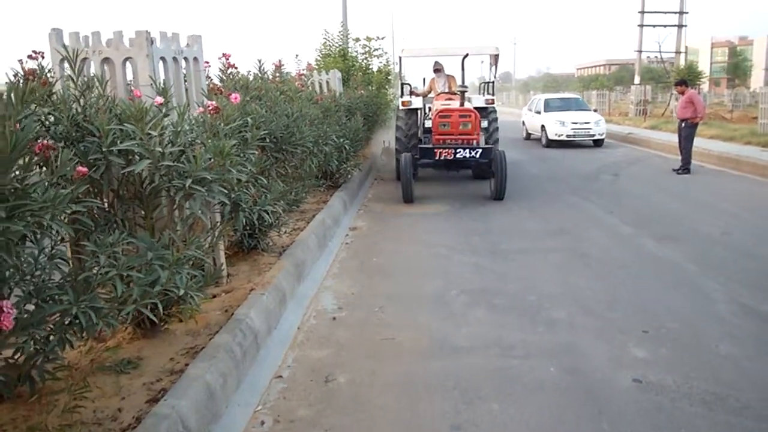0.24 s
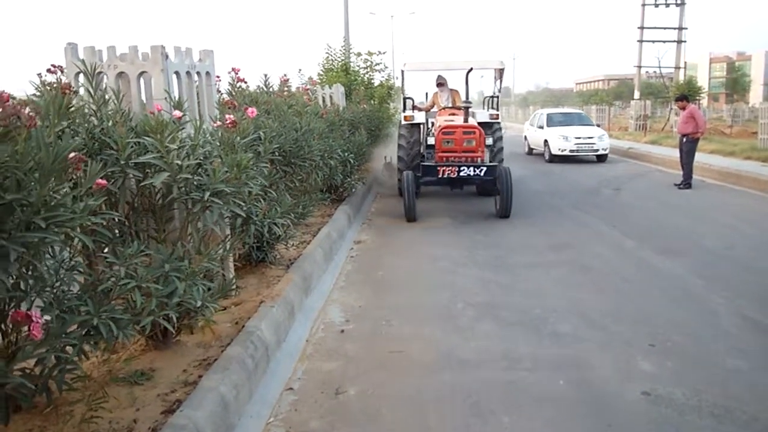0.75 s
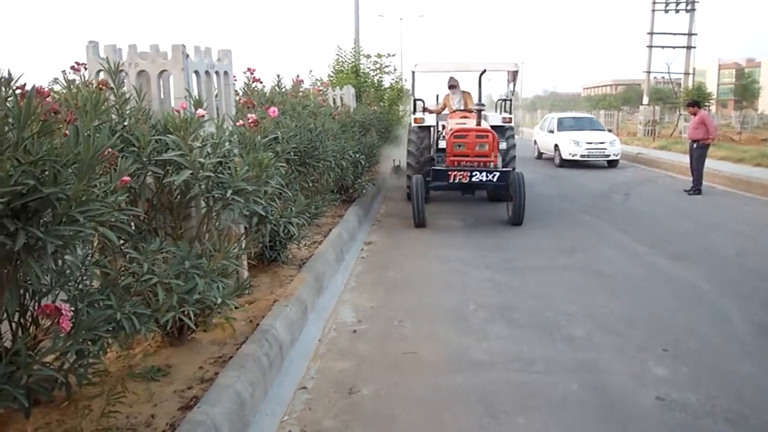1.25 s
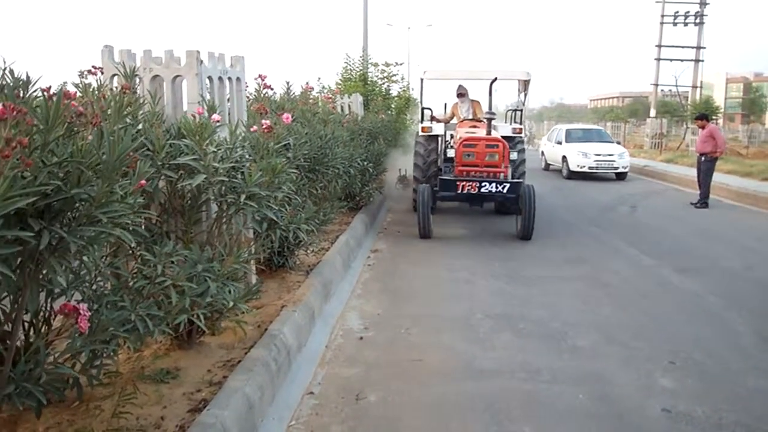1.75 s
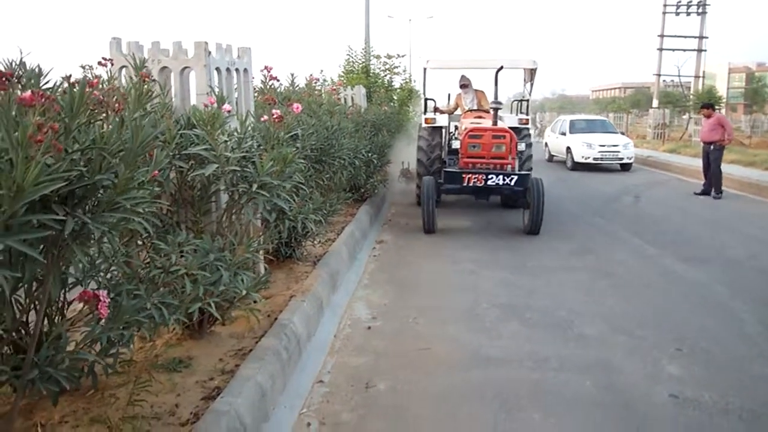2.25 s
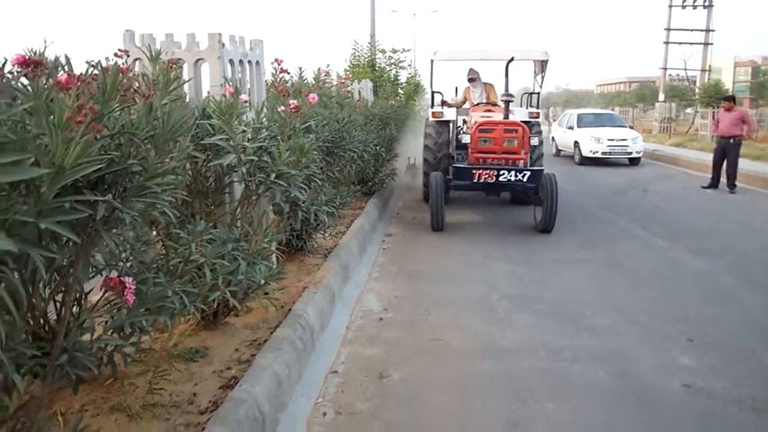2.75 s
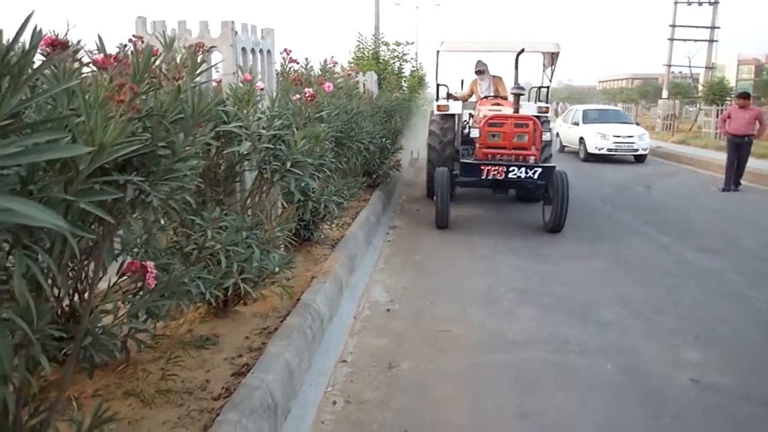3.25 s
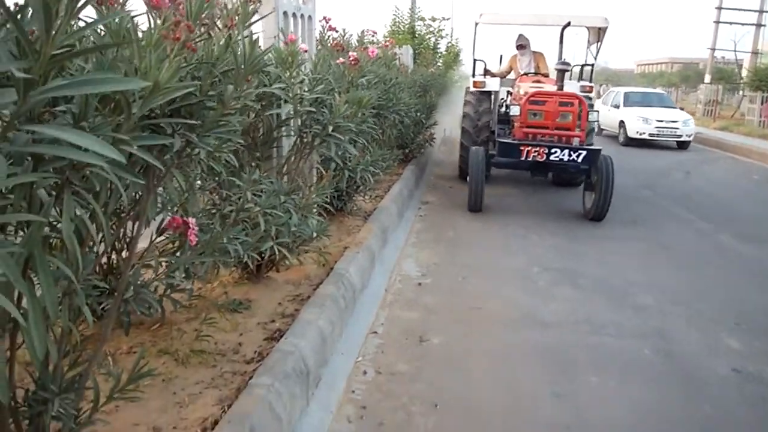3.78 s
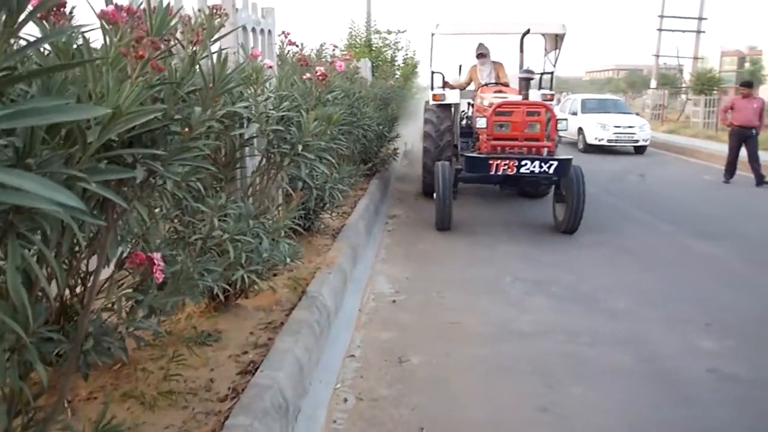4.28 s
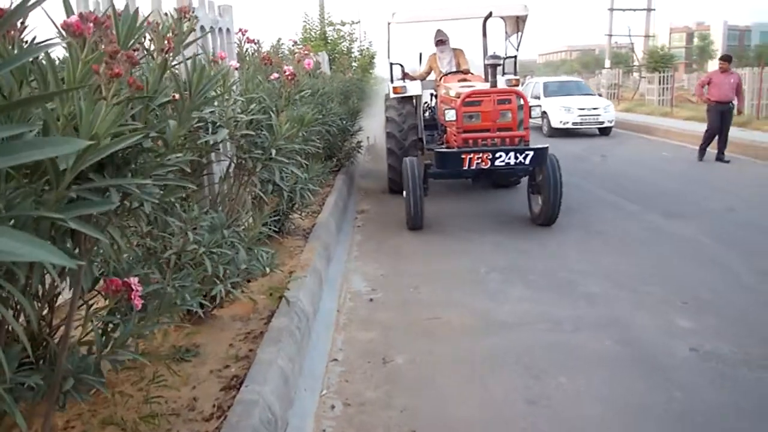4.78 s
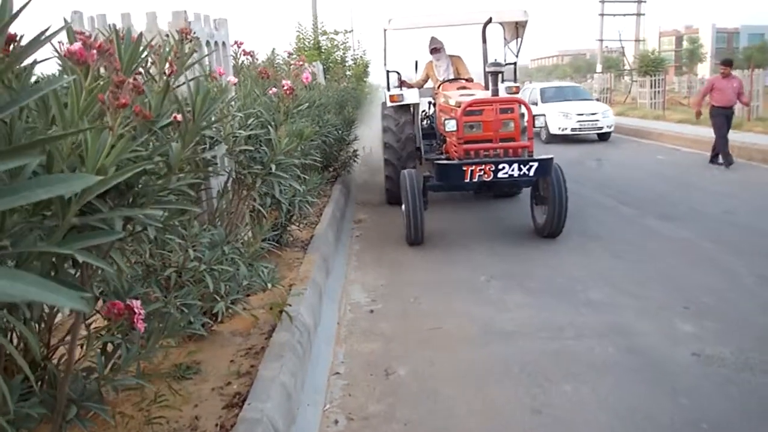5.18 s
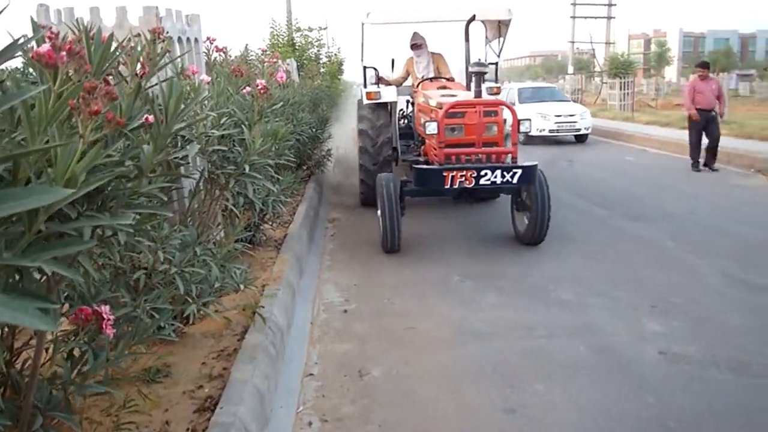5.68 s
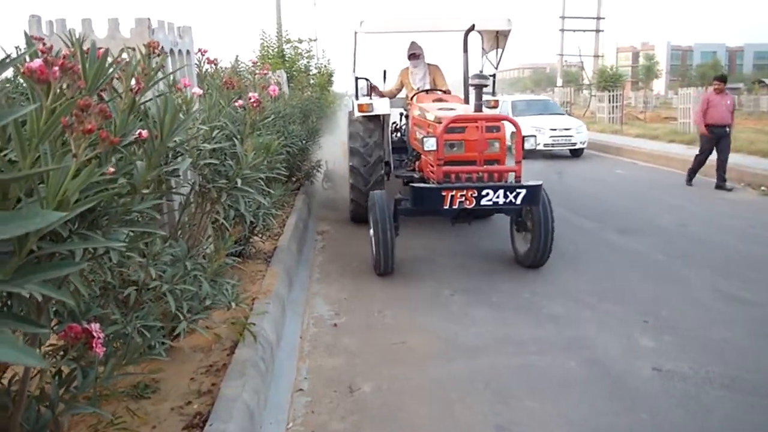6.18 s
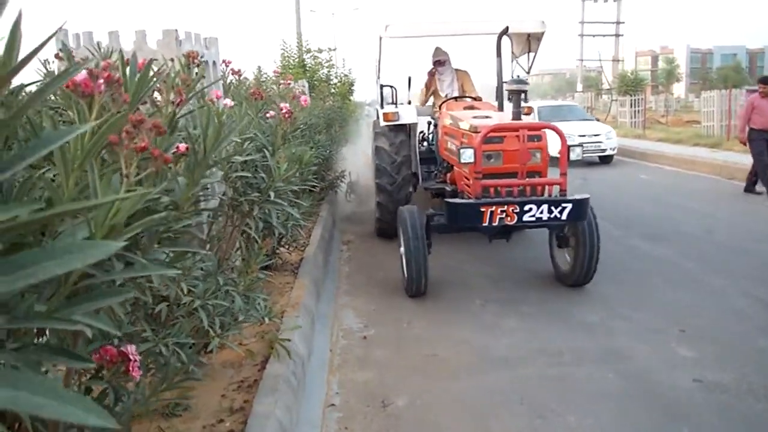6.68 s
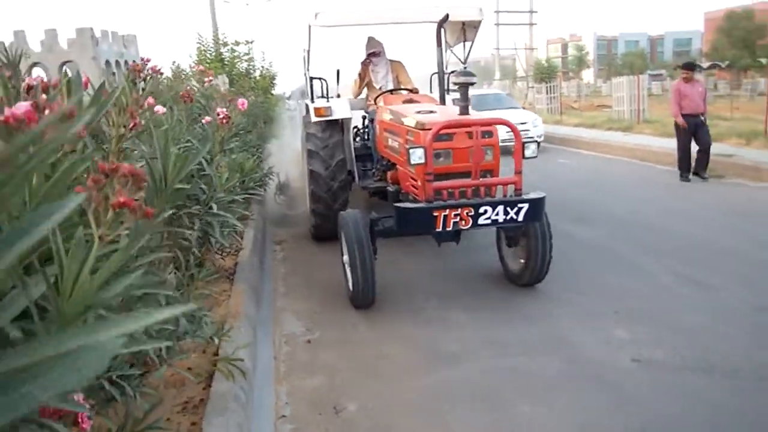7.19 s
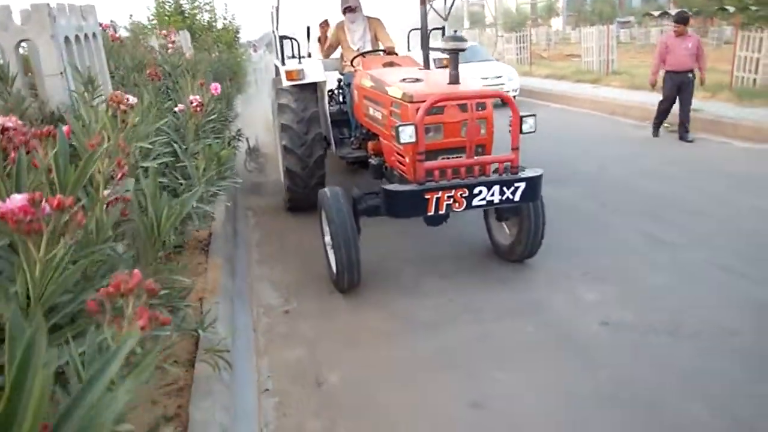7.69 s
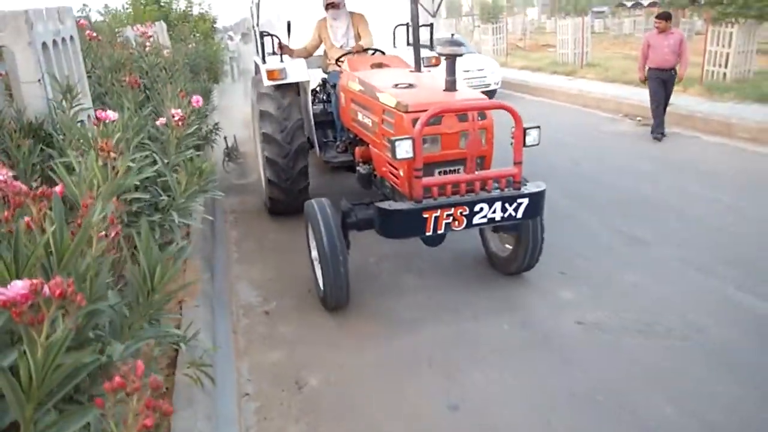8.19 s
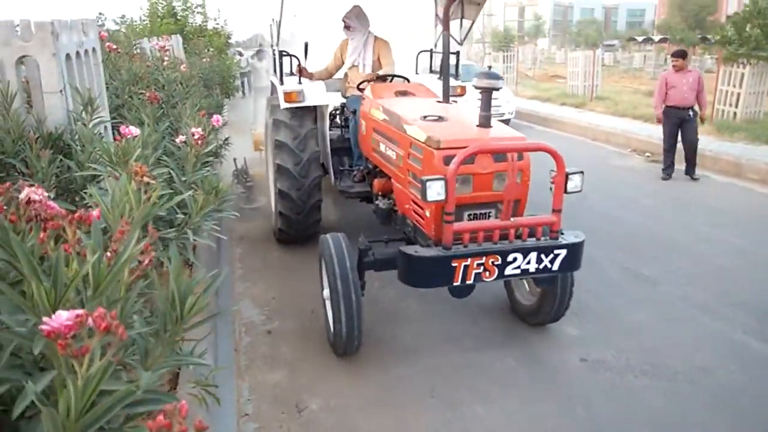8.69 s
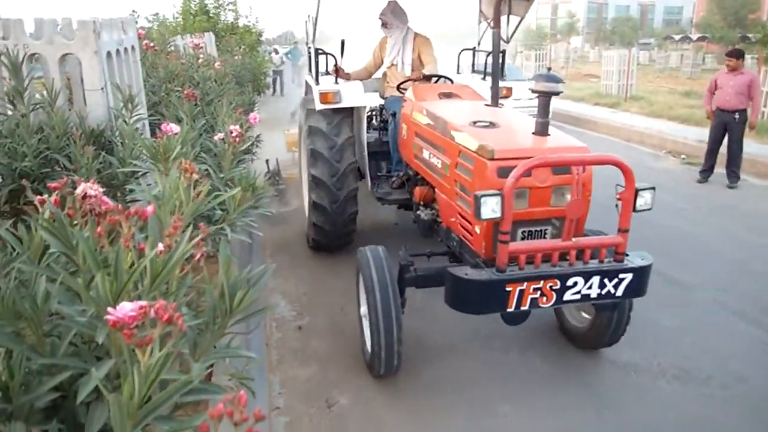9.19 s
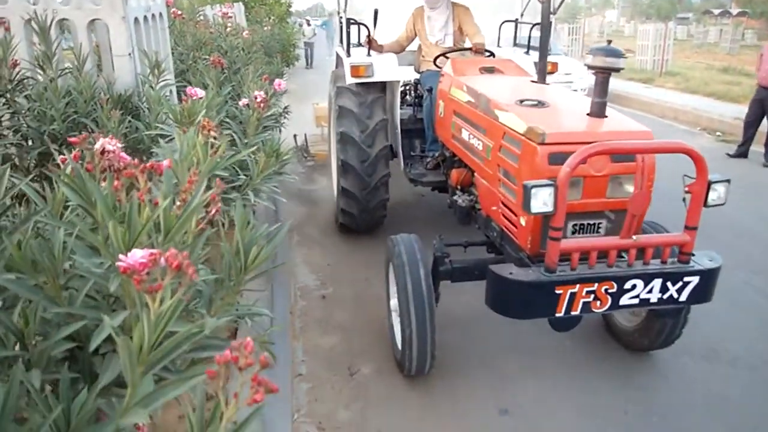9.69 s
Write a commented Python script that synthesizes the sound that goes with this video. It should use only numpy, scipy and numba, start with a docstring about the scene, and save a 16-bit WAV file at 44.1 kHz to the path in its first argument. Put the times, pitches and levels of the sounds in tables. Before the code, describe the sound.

A diesel tractor engine thumps and clatters steadily as it creeps closer outdoors, then a rotating brush scratches and hisses over concrete near the end.

```python
"""A three-cylinder diesel tractor creeps along a kerb towards the listener, towing a rotary road broom.
The exhaust thumps and barks, noise patterned on the engine cycle clatters, the fan hums and gears whine.
Late on, the broom's bristles scratch the concrete as filtered random flicks, mostly on the right.
The engine sags when the broom bites, bending all its tones; a thin squeal comes and goes.
Now and then the overall level steps up or down, with a faint click at each drop."""
import sys
import numpy as np
from scipy import signal
from scipy.fft import rfft, irfft, next_fast_len
from scipy.io import wavfile
from scipy.ndimage import uniform_filter1d
from numba import njit

SR = 44100
rng = np.random.default_rng(int(sys.argv[2]) if len(sys.argv) > 2 else 0)


def wav_record(signal):
    """Record a signal, one row per channel, as 16-bit PCM in the file named by sys.argv[1]."""
    frames = np.transpose(np.atleast_2d(signal))
    bounded = np.clip(frames, -1, 1)
    # unit amplitude maps onto the largest positive 16-bit level
    quanta = np.round(bounded * 32767).astype(np.int16)
    wavfile.write(sys.argv[1], SR, quanta)


N = 438354

# Engine speed: one engine cycle is two crank turns
FIRINGS_PER_CYCLE = 3
UNLOADED_FIRING_HZ, START_FIRINGS = 39.593, -.43
# the broom bites and drags the engine down: [t/s, half length/s, sag/Hz]
BITES = [(0, .428, .566), (2.103, 1.223, .912), (5.767, .667, 1.259), (9.342, .742, 1.891)]

# The straight approach, and the heights of the exhaust outlet and the listening point
START_M, SPEED_M_S, PIPE_HEIGHT_M, MIC_HEIGHT_M = 11.86, 0.99, 1.81, 1.41

# Exhaust; the other engine and broom levels count from the thump
THUMP_DB = -21.5
# relative strength of each multiple of the firing rate, second upward: [level/dB]
OVERTONES = [-0.5, 0, -0.5, -9.5, -3.5]
# start level, and its change each time the distance halves
OVERTONE_DB, OVERTONE_NEARING_DB = -8, -2.5
RUMBLE_DB, RUMBLE_NEARING_DB = -12, -2.5
LOW_PIPE_DB, LOW_PIPE_NEARING_DB = -24, 1
# gas noise: [f/Hz, level/dB]
RUMBLE_COLOUR = [(15, 2), (30, 6.5), (60, -6.5), (150, 4), (280, -0.5), (420, -11), (600, -10.5),
                 (2000, -51), (8000, -90)]
# the pipe's lowest resonance: [f/Hz, level/dB]
LOW_PIPE_COLOUR = [(45, -11), (70, 2), (88, -1), (115, -13), (200, -40), (1500, -120)]
# gas puffs in one cycle: [place/firings, length/firings, level/dB]
PUFFS = [(0, 0.75, -2), (1.05, 0.61, -5.5), (2, 0.49, -3.5)]
# gas puffs: [f/Hz, level/dB]
PUFF_COLOUR = [(25, -32), (50, 1), (85, 2), (110, -16), (145, -11.5), (200, 5), (250, -6), (300, -1),
               (400, -14), (470, -2), (600, -6.5), (800, -12), (1500, -70), (6000, -110)]
# puffs as the pipe turns: [t at half way/s, time taken/s, level before/dB, level after/dB]
PIPE_VIEW = (4, 5, -11.5, -10.5)
# ringing barks in one cycle: [place/firings, length/firings, level/dB, f/Hz, glide/(Hz per firing),
# then for each halving of distance: level change/dB, f change/Hz, delay/firings]
BARKS = [(0.163, 0.15, -5.5, 329, 58, 5.5, -19.5, 0.03), (0.946, 0.91, -12.5, 321, 71, -5, -5, 0.029),
         (2.037, 0.17, -6, 391, -220, 4, 9, -0.013), (2.341, 0.21, 2, 358.6, 20, 1, -7, 0.033),
         (2.862, .35, -1.5, 368, 40, -6, 10, 0.0057), (1.721, 0.22, -10, 745, -800, 4.5, 2, 0.0085)]
# all barks together: [t/s, level/dB]
BARK_LEVEL = [(0, 2), (1.8, -4), (3.8, -0.5), (4.8, 2), (6, 1.5), (8.7, .3), (9.9, -0.5)]
# engine partials that sing out: [multiple of the cycle rate]
DRONE_MULTIPLES = [19, 23, 26, 29, 29, 32, 46, 53, 62, 67, 79, 86, 92, 95]
# one row for each multiple: [t at strongest/s, half length/s, level/dB]
DRONES = [(8.6, 0.38, -11), (8.4, 1, -15.5), (6.8, 1.9, -16), (0.24, 1.3, -15), (6, 1.6, -8),
          (8.86, 1.1, -15.5), (8.53, 0.81, -13), (8.36, 0.68, -12.5), (6.16, 0.55, -23), (9.6, 0.77, -17),
          (9.3, 0.36, -16.5), (8.6, 0.48, -13.5), (8.45, .4, -16), (9.37, 0.27, -12.5)]

# Engine block; start level and change as the distance halves
CLATTER_DB, CLATTER_NEARING_DB = -7, 0.17
# mechanical knocks in one cycle: [place/firings, length/firings, level/dB]
KNOCKS = [(.5, 0.39, 1.5), (.8, 0.11, -3), (1.6, 0.32, 8), (1.9, 0.17, 5.5), (2.48, 0.28, 5),
          (2.7, 0.41, 6)]
# clatter from the tractor's front: [f/Hz, level/dB]
FRONT_COLOUR = [(150, -5), (400, -6), (540, -6.5), (660, -4), (800, 1), (910, -3.5), (1100, -4.5),
                (1350, -3), (1520, -9), (1750, -16.5), (2200, -14.5), (2500, -23.5), (2750, -22.5),
                (3200, -26.5), (3700, -34), (6000, -35.5), (15000, -71)]
# clatter from its flank: [f/Hz, level/dB]
FLANK_COLOUR = [(150, -7), (400, 0), (520, -2.5), (640, 1), (760, 1), (900, -2.5), (1040, -7.5), (1230, -4),
                (1450, -12.5), (1650, -15), (2100, -19.5), (2700, -22), (3500, -34.5), (6000, -37),
                (15000, -88)]
# the flank takes over from the front around TURN_S
TURN_S, TURN_LENGTH_S = 5.5, 5.3
# stereo place of clatter and panels: [t/s, left minus right level/dB]
CLATTER_SIDE = [(0.0, 6.5), (1.36, 7.5), (2.74, 17), (5.98, 5.5), (7.34, 7.5), (8.06, 0), (9.94, 0.5)]
# panel resonances: [f/Hz, width/Hz, level/dB]
PANELS = [(420, 30, 13), (625, 28, 2), (690, 50, 1.5), (809, 48, -3.5)]
# panels coming into view: [t at half way/s, time taken/s, level before/dB, level after/dB]
FLANK_VIEW = (8, 1, -23.5, -14)
# fine engine hiss: [f/Hz, level/dB]
HISS_COLOUR = [(1500, -1.5), (2800, 1.5), (3700, -7), (5200, -1.5), (6000, -6), (6800, -12), (8600, -7),
               (9800, -12), (11800, -16.5), (12700, -20.5), (14200, -20.5), (15700, -40)]

# Fan turning out of view: [t at half way/s, time taken/s, level before/dB, level after/dB]
FAN_VIEW = (6.5, 2.5, -9, -20.5)

# Gears
GEAR_TEETH = 58  # meshes in one engine cycle
# load on the teeth in one cycle: [place/firings, length/firings, level/dB]
GEAR_LOAD = [(1.3, 0.5, -3.5), (2, 0.27, -6.5), (2.75, 0.4, -11)]
# gear whine: [t/s, level/dB]
WHINE_LEVEL = [(0, -8.5), (1.4, -8), (2.1, -13.5), (2.8, -11.5), (4.2, -17), (6.3, -11.5), (6.8, -24),
               (7.4, -16.5), (8.1, -17), (8.8, -16), (9.4, -13), (9.9, -20)]

# Steps of the overall level: [from t/s, to t/s, level change/dB]
LEVEL_STEPS = [(0.445, 0.99, 1.65), (0.97, 1.774, -1.3), (1.77, 1.827, 1.5), (2.474, 2.725, -1.6),
               (2.745, 2.896, 0.2), (3.984, 4.16, -1.8), (4.63, 5.056, 0.9), (5.047, 5.242, -2.5),
               (5.284, 5.624, -1.2), (5.62, 5.673, 1), (5.937, 5.98, 2.5), (6.524, 6.723, -2.5),
               (6.737, 6.824, 2), (6.825, 7.013, -2), (7.02, 7.12, 1.5), (7.468, 7.51, 2.5),
               (7.708, 7.734, 2.5), (8.17, 9.348, 1.54), (9.35, 10.002, -0.5)]
RISE_S, FALL_S = 0.015, 0.0048  # the level climbs softly and drops sharply
CLICK_DB = -37  # impulse that accompanies a drop of 1 dB

# Squeal
SQUEAL_FROM_S, SQUEAL_TO_S, SQUEAL_FADE_S = 2.5, 5.05, 0.34
SQUEAL_HZ, SQUEAL_SAG_HZ, SQUEAL_DB, SQUEAL_SWELL_DB = 2146, 48.2, -53.5, 7

# Bonnet ring: [t/s, level/dB]
BONNET_LEVEL = [(5, -38.5), (5.7, -23), (6.4, -13), (7.4, -18), (8.1, -17), (8.7, -13.5), (9.9, -20)]
BONNET_HZ, BONNET_WIDTH_HZ = 1188.0, 95.0

# The engine labours and knocks harder: [t/s, half length/s, level/dB]
LABOURS = [(5.95, 0.57, -18), (7.1, 0.82, -21.5), (7.73, .06, -29), (8.136, 0.5, -15.5), (8.9, 0.44, -17)]
# hard diesel knock: [f/Hz, level/dB]
KNOCK_COLOUR = [(500, -23), (1200, 4.5), (1550, -1), (1950, 6), (2250, 1.5), (2600, -2), (3000, -5.5),
                (4000, -16.5), (7000, -23.5), (15000, -73)]

# Broom: bristles dig in during one cycle: [place/firings, length/firings, level/dB]
DIGS = [(.7, .2, -19), (1.7, .3, -1.5), (2.65, 0.39, -3.5)]
RASP_DB = 1.0  # coarseness of the scraping
# bristles scraping concrete: [f/Hz, level/dB]
SCRAPE_COLOUR = [(500, -46), (1200, 8), (1550, 4.5), (1800, 9.5), (2050, 7.5), (2300, 4), (2550, 10.5),
                 (2800, -7.5), (3200, -8.5), (3650, -26), (4300, -18), (7000, -35), (15000, -64)]
# bristle hiss: [f/Hz, level/dB]
BRISTLE_COLOUR = [(1800, -23), (3000, -1), (3800, -2.5), (4600, -6), (5600, -11.5), (6700, -19.5),
                  (8800, -21.5), (11000, -42), (15500, -42)]
# views of the scrape, the lower hiss and the upper hiss, in that order, each:
# [t at half way/s, time taken/s, level before/dB, level after/dB]
SCRAPE_VIEW = (8, 0.94, -30, -5.5)
BRISTLE_VIEW = (8, 0.5, -35, -8)
BRISTLE_TREBLE_VIEW = (8.5, 0.6, -32, -9)
SHADOWED_HZ = 3820  # above this the tractor shadows the bristles for longer
# moving swish band: [t/s, f/Hz, level/dB]
SWISH = [(7.5, 1950, -45), (8.2, 2200, -26), (8.7, 2580, -11.5), (9.0, 2860, -8.5), (9.27, 3900, -9.5),
         (9.55, 4000, -11), (9.94, 3420, -7)]
SWISH_WIDTH_HZ = 1500.0
# reflection off the kerb: [t/s, delay/ms]
KERB_ECHO_MS = [(8, 0.54), (9, 0.8), (9.94, 0.78)]
# stereo place of the broom: [f/Hz, left minus right level/dB]
BROOM_SIDE = [(1000, 15), (1700, -9.5), (2400, -9), (4400, -28), (6000, -5), (8100, -6), (15000, 3)]

TOP_HZ = 15700  # upper edge of the finished sound


def undb(db):
    """Turn decibels into gain."""
    return 10 ** (np.asarray(db) / 20)


def unit(x):
    """Scale to rms 1."""
    return x / np.sqrt(np.mean(x ** 2))


def seconds():
    """Give the time of every sample."""
    return np.arange(N) / SR


def curves(table):
    """Draw each column of a timed table as one value a sample."""
    times, *columns = np.transpose(table)
    return [np.interp(seconds(), times, column) for column in columns]


def ramp(at, length):
    """Rise straight from 0 to 1, centred on a moment."""
    return np.clip((seconds() - at) / length + .5, 0, 1)


def swell(at, half_length):
    """Rise in a bell shape to 1 and back."""
    return np.exp(-((seconds() - at) / half_length) ** 2)


def walk(rate):
    """Wander by smoothed random steps, rate times a second, with rms 1."""
    step = int(SR / rate)
    held = np.repeat(rng.standard_normal(N // step + 1), step)
    smooth = uniform_filter1d(uniform_filter1d(held, step), step)
    return unit(smooth[:N])


def shape(points, hz):
    """Read (f/Hz, level/dB) points as gains on a log-frequency axis."""
    f, db = np.transpose(points)
    return undb(np.interp(np.log(hz + 1), np.log(f), db))


def colour(x, points):
    """Filter by a (f/Hz, level/dB) spectrum."""
    size = next_fast_len(N)
    gains = shape(points, np.fft.rfftfreq(size, 1 / SR))
    return irfft(rfft(x, size) * gains, size)[..., :N]


@njit
def resonate(x, hz, width):
    """Ring a two-pole band-pass whose centre can move from sample to sample."""
    y, band, low = np.empty(len(x)), 0., 0.
    for i in range(len(x)):
        g, damping = np.tan(np.pi * hz[i] / SR), width / hz[i]
        v = (band + g * (x[i] - low)) / (1 + g * (g + damping))
        band, low, y[i] = 2 * v - band, low + 2 * g * v, damping * v
    return y


def pan(side_db):
    """Give left and right gains whose mean is 1."""
    gains = undb(np.array([[1], [-1]]) * side_db / 2)
    return gains / gains.mean(axis=0)


def spread(pair, width):
    """Use two signals as middle and side of a stereo sound."""
    return pair[0] + width * np.array([[1], [-1]]) * pair[1]


def distance():
    """Give the metres left along a steady approach, never below one."""
    return np.maximum(START_M - SPEED_M_S * seconds(), 1)


def halvings():
    """Count how many times the distance has halved since the start."""
    return np.log2(START_M / distance())


def nearing(start_db, halving_db):
    """Change the gain by a fixed step each time the distance halves."""
    return undb(start_db + halving_db * halvings())


def in_view(at, length, before_db, after_db):
    """Fade a part smoothly as it moves into or out of view."""
    seen = (1 + np.tanh((seconds() - at) / length)) / 2
    return undb(before_db + (after_db - before_db) * seen)


def over_road(x, reflect):
    """Comb the sound with its road bounce; peaks and dips sink as the detour grows with nearness."""
    r, now = distance(), np.arange(N)
    bounced = np.hypot(r, PIPE_HEIGHT_M + MIC_HEIGHT_M)
    direct = np.hypot(r, PIPE_HEIGHT_M - MIC_HEIGHT_M)
    delay = (bounced - direct) / 343 * SR  # 343 m/s is the speed of sound
    return unit(x + reflect * np.interp(now - delay, now, x))


def gate(firings, bursts, floor_db, rise=0.072):
    """Give the strength at each crank position: bursts start quickly and die away over a floor."""
    strength = undb(floor_db)
    for at, length, db in bursts:
        age = (firings - at + 1) % FIRINGS_PER_CYCLE - 1
        strength = strength + undb(db) * np.exp(-(age / np.where(age < 0, rise, length)) ** 2)
    return strength


def repeating(firings, bursts, floor_db, uneven_db, size=3400):
    """Make a broadband rattle that comes back alike in every engine cycle."""
    grid = np.arange(size) * FIRINGS_PER_CYCLE / size
    cycle = gate(grid, bursts, floor_db) * rng.standard_normal(size)
    # each multiple of the cycle rate is a line; some stand out more than others
    lines = undb(uneven_db * rng.uniform(-1.36, 1, size // 2 + 1))
    cycle = irfft(lines * np.exp(1j * np.angle(rfft(cycle))), size)
    return unit(np.interp(firings % FIRINGS_PER_CYCLE, grid, cycle))


def rattle(firings, bursts, floor_db, uneven_db, loose, drift):
    """Morph slowly between two repeating rattles, drift in rad/s, plus a loose share new in each cycle."""
    turn = drift * seconds()
    first, second = (repeating(firings, bursts, floor_db, uneven_db) for _ in range(2))
    fresh = gate(firings, bursts, floor_db) * rng.standard_normal(N)
    return unit(np.cos(turn) * first + np.sin(turn) * second) + loose * unit(fresh)


def barks(firings):
    """Sound each bark as a short, gliding note of the pipe, at its own place in the cycle."""
    near, sound = halvings(), 0
    for at, length, db, hz, glide, more_db, more_hz, delay in BARKS:
        age = (firings - at - delay * near + 1.5) % FIRINGS_PER_CYCLE - 1.5
        pitch = hz + more_hz * near + glide * age / 2
        note = np.cos(2 * np.pi * pitch * age / UNLOADED_FIRING_HZ)
        level = undb(db + more_db * near + 0.83 * walk(26))
        sound = sound + level * np.exp(-(age / length) ** 2) * note
    return sound * undb(curves(BARK_LEVEL)[0])


def drone(firings):
    """Let single engine partials sing out in turn, their pitch bending with the engine speed."""
    sound = 0
    for multiple, (at, half_length, db) in zip(DRONE_MULTIPLES, DRONES):
        partial = np.cos(2 * np.pi * multiple * (firings - 2.4) / FIRINGS_PER_CYCLE)
        sound = sound + undb(db + 1.1 * walk(7.6)) * swell(at, half_length) * partial
    return sound


def exhaust(firings):
    """Sum the firing-rate thump and overtones, gas puffs and rumble, and the pipe's barks and resonance."""
    turn = 2 * np.pi * firings
    thump = unit(np.cos(turn))
    tone = sum(undb(db + 1.0 * walk(4.6)) * np.cos(k * (turn - .35)) for k, db in enumerate(OVERTONES, 2))
    tone = over_road(tone, reflect=0.52) * nearing(OVERTONE_DB, OVERTONE_NEARING_DB)
    puff = rattle(firings, PUFFS, floor_db=-27.5, uneven_db=12, loose=0.32, drift=0.18)
    puff = over_road(colour(puff, PUFF_COLOUR), reflect=0.19) * in_view(*PIPE_VIEW)
    boom = unit(colour(rng.standard_normal(N), LOW_PIPE_COLOUR))
    boom = boom * nearing(LOW_PIPE_DB, LOW_PIPE_NEARING_DB)
    rumble = over_road(colour(rng.standard_normal(N), RUMBLE_COLOUR), reflect=0.22)
    rumble = rumble * nearing(RUMBLE_DB, RUMBLE_NEARING_DB)
    pipe = barks(firings) + drone(firings) + puff + boom
    return (thump + tone + rumble) * pan(1.36) + pipe * pan(1.6)


def clatter(firings):
    """Rattle the block by combustion knock and valve gear, crossfading from front to flank colour."""
    # slight timing jitter roughens the pattern
    pair = np.array([rattle(firings + .004 * walk(30), KNOCKS, floor_db=10, uneven_db=7.5,
                            loose=0.8, drift=0.6) for _ in range(2)])
    flank = ramp(TURN_S, TURN_LENGTH_S)
    front_sound = (1 - flank) * unit(colour(pair, FRONT_COLOUR))
    flank_sound = flank * unit(colour(pair, FLANK_COLOUR))
    return spread(front_sound + flank_sound, width=0.16) * nearing(CLATTER_DB, CLATTER_NEARING_DB)


def panels(firings):
    """Ring the panels' narrow resonances with the engine's shaking."""
    shake = rattle(firings, KNOCKS, floor_db=10.0, uneven_db=3, loose=0.46, drift=0.3)
    rings = 0
    for hz, width, db in PANELS:
        rings = rings + undb(db) * signal.lfilter(*signal.iirpeak(hz, hz / width, fs=SR), shake)
    band = signal.butter(2, [450, 1500], "bandpass", fs=SR, output="sos")
    return in_view(*FLANK_VIEW) * unit(signal.sosfilt(band, rings))


def block(firings):
    """Join clatter, ringing panels and a fine hiss that pulses with the knocks."""
    side_db, = curves(CLATTER_SIDE)
    pulse = gate(firings, KNOCKS, floor_db=15.0, rise=0.055)
    hiss = unit(colour(rng.standard_normal((2, N)) * pulse, HISS_COLOUR))
    return (clatter(firings) + panels(firings)) * pan(side_db) + undb(-25.5) * hiss * pan(10.5)


def fan(firings):
    """Hum the belt-driven fan's blade tone, fading as the grille turns away."""
    turn = 2 * np.pi * (4.826 * firings + .006 * walk(25))  # 4.826 blade passes a firing
    return unit(np.cos(turn) * undb(0.49 * walk(22))) * in_view(*FAN_VIEW) * pan(0.62)


def gears(firings):
    """Whine at the tooth-mesh rate, throbbing with the load, over a steadier tone an octave below."""
    turn = 2 * np.pi * GEAR_TEETH * firings / FIRINGS_PER_CYCLE
    load = gate(firings, GEAR_LOAD, floor_db=-12, rise=0.36)
    whine = unit(np.cos(turn) * load * undb(.5 * walk(13)))
    octave_below = undb(-2.5) * np.cos(turn / 2)
    return undb(curves(WHINE_LEVEL)[0]) * (whine * pan(7.8) + octave_below * pan(1.7))


def level_steps():
    """Give the gain as the overall level steps up and down, and the faint click of each sharp drop."""
    level_db, clicks = np.zeros(N), np.zeros(N)
    for start, end, db in LEVEL_STEPS:
        rise, drop = (start, end) if db > 0 else (end, start)
        level_db += abs(db) * (ramp(rise, RISE_S) - ramp(drop, FALL_S))
        clicks[min(int(drop * SR), N - 1)] += abs(db) * undb(CLICK_DB)
    return undb(level_db), signal.lfilter([1], [1, -.5], clicks) * pan(2)


def squeal():
    """Sing a thin, wavering sine from the moving machinery; it swells and goes flat before it stops."""
    late = ramp((SQUEAL_FROM_S + SQUEAL_TO_S) / 2, SQUEAL_TO_S - SQUEAL_FROM_S) ** 2
    held = ramp(SQUEAL_FROM_S, SQUEAL_FADE_S) - ramp(SQUEAL_TO_S, SQUEAL_FADE_S)
    hz = SQUEAL_HZ - SQUEAL_SAG_HZ * late + 6 * walk(250)
    tone = unit(np.sin(2 * np.pi * np.cumsum(hz) / SR))
    level = undb(SQUEAL_DB + SQUEAL_SWELL_DB * late + 0.72 * walk(40))
    return held * level * tone * pan(17.0)


def bonnet(firings):
    """Shake the bonnet; engine partials glide through its panel resonance as the speed sags."""
    shake = rattle(firings, KNOCKS, floor_db=13, uneven_db=8.5, loose=.45, drift=0.39)
    hz = np.full(N, BONNET_HZ)
    once = resonate(shake, hz, BONNET_WIDTH_HZ)
    ring = unit(resonate(once, hz, BONNET_WIDTH_HZ))
    return undb(curves(BONNET_LEVEL)[0]) * ring * pan(8.1)


def knock(firings):
    """Bring out a hard, bright diesel knock under load, patterned on the engine cycle."""
    load = sum(undb(db) * swell(at, half_length) for at, half_length, db in LABOURS)
    pair = np.array([rattle(firings, KNOCKS, floor_db=5, uneven_db=8, loose=0.43, drift=0.41)
                     for _ in range(2)])
    return load * spread(unit(colour(pair, KNOCK_COLOUR)), width=0.5) * pan(-2)


def rasp(firings):
    """Dig the shaking broom in harder at some places in the cycle, with random roughness."""
    dig = gate(firings + .04 * walk(28), DIGS, floor_db=0, rise=0.091)
    return unit(dig * undb(RASP_DB * walk(110)))


def swish(dig):
    """Sweep a resonant band of sparse grit upward, easing back a little at the end."""
    hz, db = curves(SWISH)
    grit = rng.standard_normal((2, N)) * (rng.random((2, N)) < .06) * dig ** 0.26
    bands = [resonate(resonate(g, hz, SWISH_WIDTH_HZ), hz, SWISH_WIDTH_HZ) for g in grit]
    return undb(db) * unit(np.array(bands))


def off_kerb(x, reflect):
    """Colour the sweeping with a kerb bounce whose delay shifts as the broom nears."""
    now = np.arange(N)
    then = now - curves(KERB_ECHO_MS)[0] * SR / 1000
    return np.array([c + reflect * np.interp(then, now, c) for c in x]) / np.hypot(1, reflect)


def broom(firings):
    """Flick bristle tips over concrete as sparse noise, fluttering with the engine's shaking."""
    flicks = rng.standard_normal((2, N)) * (rng.random((2, N)) < .12)
    flick_db = 0.53 * np.minimum(rng.exponential(size=(2, N)), 6) + .5 * walk(70)
    flicks = flicks * undb(flick_db)
    dig = rasp(firings)
    scrape = unit(colour(flicks * dig, SCRAPE_COLOUR))
    hiss = unit(colour(flicks * dig ** 0.47, BRISTLE_COLOUR))  # the hiss flutters less than the scrape
    lower = signal.sosfiltfilt(signal.butter(4, SHADOWED_HZ, fs=SR, output="sos"), hiss)
    sound = in_view(*SCRAPE_VIEW) * scrape + swish(dig)
    # the top of the hiss comes out from behind the tractor last
    sound = sound + in_view(*BRISTLE_VIEW) * lower + in_view(*BRISTLE_TREBLE_VIEW) * (hiss - lower)
    left, right = off_kerb(sound, reflect=0.083)
    return np.array([colour(left, BROOM_SIDE), right])


def scene():
    """Drive the engine and broom from one crankshaft, which slows at each bite; add squeal and clicks."""
    sag_hz = sum(hz * swell(at, half_length) for at, half_length, hz in BITES)
    firings = START_FIRINGS + np.cumsum(UNLOADED_FIRING_HZ - sag_hz) / SR
    machine = exhaust(firings) + block(firings) + fan(firings) + gears(firings)
    machine = machine + bonnet(firings) + knock(firings) + broom(firings)
    gain, clicks = level_steps()
    return undb(THUMP_DB) * gain * machine + squeal() + clicks


def record(dry):
    """Cut the extreme treble with a steep low-pass."""
    return signal.sosfilt(signal.ellip(10, .2, 80, TOP_HZ, fs=SR, output="sos"), dry)


dry = scene()
out = record(dry)
wav_record(out)
```